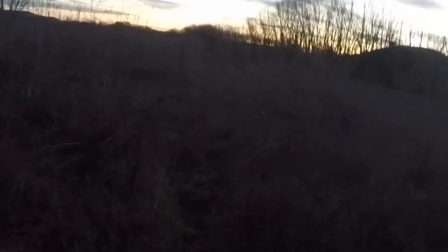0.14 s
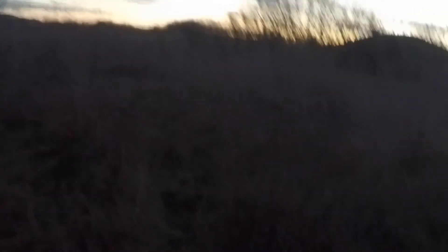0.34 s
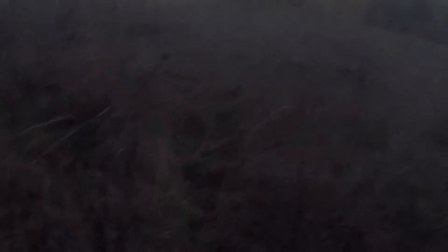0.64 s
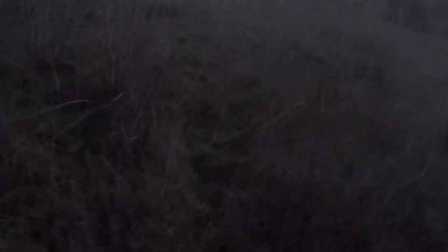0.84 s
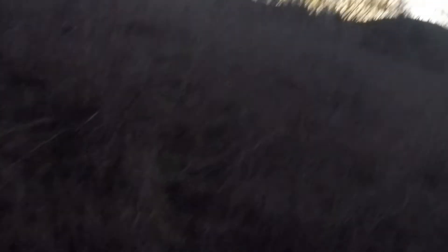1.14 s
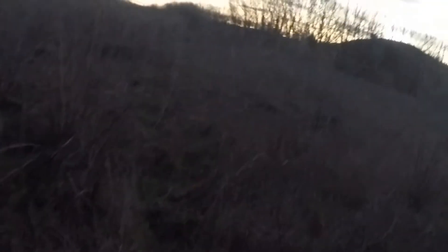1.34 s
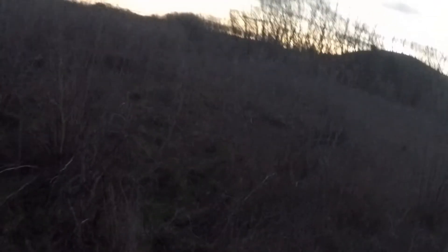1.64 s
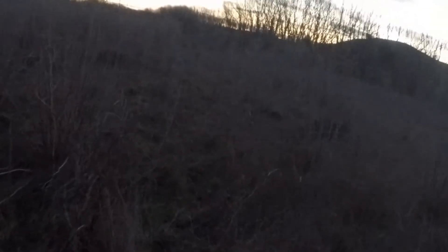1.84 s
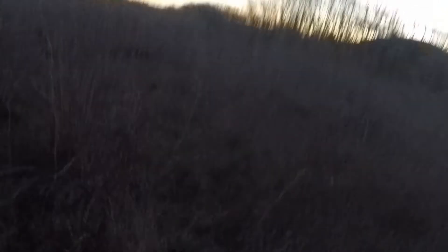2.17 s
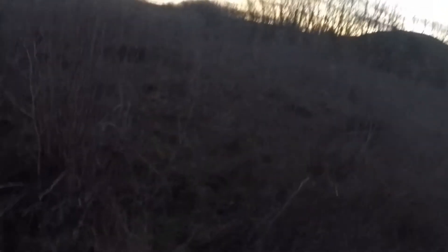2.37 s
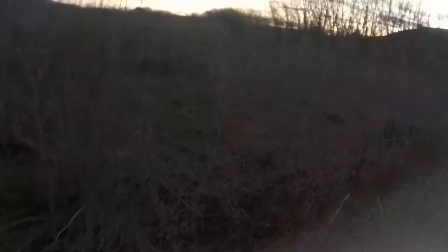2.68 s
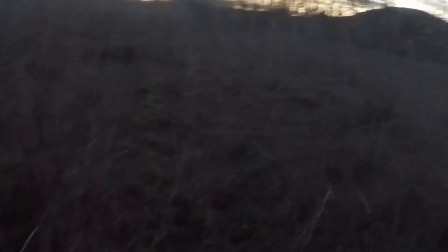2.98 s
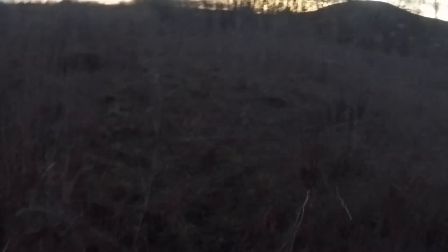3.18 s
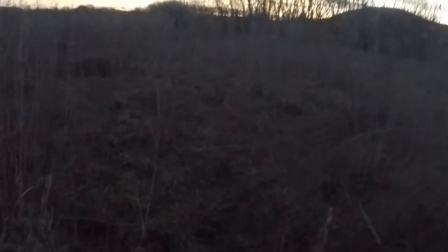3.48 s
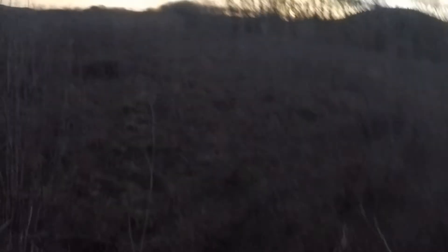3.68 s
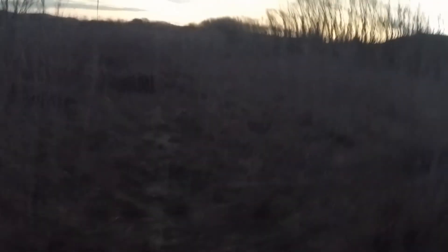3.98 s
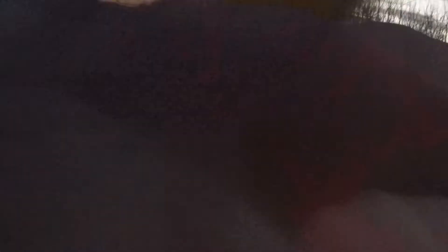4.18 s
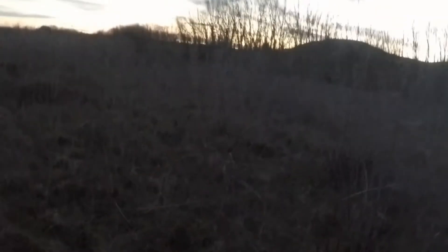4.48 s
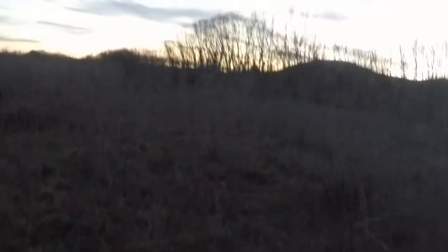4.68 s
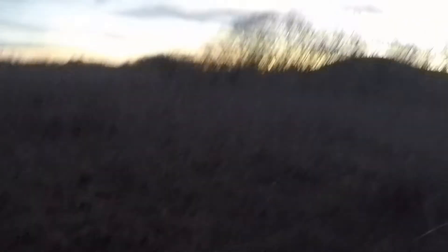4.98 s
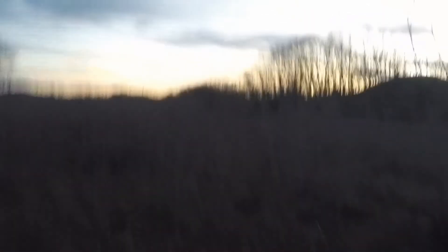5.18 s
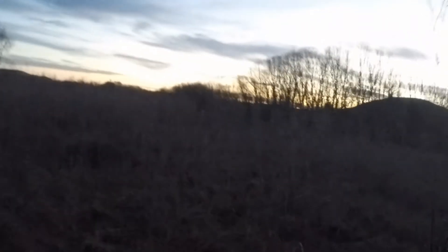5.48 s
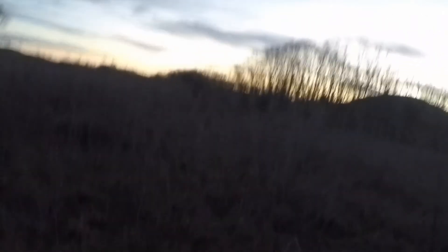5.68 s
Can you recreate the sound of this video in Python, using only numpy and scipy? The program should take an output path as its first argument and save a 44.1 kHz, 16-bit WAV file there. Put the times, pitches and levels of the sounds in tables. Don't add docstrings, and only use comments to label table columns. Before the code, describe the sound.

Dry stalks scrape and tick against a small plastic case while the gripping hand bumps it, building from near quiet to loud cracks and thuds.

```python
import sys
import numpy as np
from scipy import signal
from scipy.fft import next_fast_len
from scipy.io import wavfile

SR = 44100
rng = np.random.default_rng(int(sys.argv[2]) if len(sys.argv) > 2 else 0)


def ratio(d):
    e = np.asarray(d, float) / 20
    return 10 ** e


def wav_out(sig):
    wavfile.write(sys.argv[1], SR, np.round(np.clip(np.atleast_2d(sig).T, -1, 1) * 32767).astype(np.int16))


N = 256794


def drag(grains_per_s=2200, patch_db=2.1, judder_db=1.6):
    # frequency in Hz, level in dB per Hz.
    drag_colour = [(180, -42), (300, -15), (476, -21), (641, -7.5), (835, -13), (968, -1), (1370, -5),
                   (2040, 3), (2790, -4), (4420, -15), (4960, -13), (7500, -19), (8280, -23), (14800, -28),
                   (15500, -27)]
    # start in s, end in s, pitch in Hz, level in dB re the drag.
    singing = [(.245, 0.327, 3560, -8), (.245, 0.325, 7150, 4), (0.735, 0.786, 1330, 8),
               (0.728, 0.778, 2280, 7), (0.89, 1.01, 3510, 1.5), (1.025, 1.135, 905, -2),
               (1.033, 1.13, 2700, -2), (1.15, 1.36, 4400, -11), (1.7, 1.79, 1950, -3),
               (2.767, 2.812, 2130, 3), (2.835, 2.895, 760, -9), (2.982, 3.697, 4390, -17),
               (1.34, 1.46, 2000, -5), (3.485, 3.55, 2250, -3), (4.53, 4.57, 2100, -3),
               (4.6, 4.635, 2300, -3), (4.6, 4.64, 3700, -6), (4.67, 4.695, 2100, -2),
               (4.795, 4.815, 5500, -13), (5.4, 5.62, 2500, -3), (5.72, 5.82, 5450, -8)]
    dull_gain, middle_gain, edge_gain, bright_gain = strokes()

    sizes = ratio(2.5 * np.minimum(rng.exponential(1, (2, N)), 4)) * rng.standard_normal((2, N))
    grains = sizes * (0.6 + 1.5 * (rng.random(N) < grains_per_s / SR))

    edges_hz = np.geomspace(290, 17500, 21)
    hz, colour_db = np.transpose(drag_colour)
    parts = np.zeros((4, N))
    for k, (low, high) in enumerate(zip(edges_hz, edges_hz[1:])):
        centre = np.sqrt(low * high)
        patch = patch_db * (drift(7.9) + 0.87 * drift(30.0))
        gain_db = np.interp(np.log(centre), np.log(hz), colour_db) + patch
        part = np.searchsorted([1000, 2900, 5200], centre)
        parts[part] += ratio(gain_db) * band(grains[k % 2], low, high)
    dull, middle, edge, bright = [rms_one(p) for p in parts]
    rub = dull_gain * dull + middle_gain * middle + edge_gain * edge + bright_gain * bright

    t = np.arange(N) / SR
    for start, end, wall_hz, db in singing:
        stroke = np.clip(np.minimum(t - start, end - t) / 0.01, 0, 1)
        wall = rms_one(ring(grains[0], wall_hz, 40 / wall_hz))
        rub += ratio(db) * middle_gain * stroke * wall

    judder = ratio(judder_db * drift(40.0))
    passband = signal.ellip(10, 0.5, 50, 15300, fs=SR, output="sos")
    return signal.sosfilt(passband, judder * rub)


def strokes():
    # start in s, length in s, level in dB, swell to the end in dB, hardness in dB.
    sweeps = [(0.238, 0.083, -71.5, 0, 25), (0.36, 0.1, -68, -4, 18), (0.723, 0.134, -51.8, -8.0, -21.5),
              (0.901, 0.104, -39, 1.8, 12), (1.148, 0.3, -40.1, 9.4, 2.9), (1.485, 0.1, -39.7, 7.1, 4),
              (1.638, 0.025, -40, 8, 2), (1.663, 0.12, -30.5, -10, 2), (2.403, 0.092, -35.3, 3.3, 4.2),
              (2.501, 0.031, -31, 5, 8), (2.564, 0.012, -25, 9, -1), (2.576, 0.007, -17, -8, -3),
              (2.716, 0.005, -31, -4, 6), (3.247, 0.048, -31.2, -17.1, -3.4),
              (3.338, 0.048, -26.4, -4.6, 4.7), (3.417, 0.03, -30.5, -1.8, 2.8), (3.468, 0.02, -32, 10, 4),
              (3.488, 0.06, -22, -8, 4), (3.565, 0.035, -38.0, 0, -3), (3.602, 0.036, -28.5, -2, 4),
              (3.645, 0.06, -35, 0, -2), (3.892, 0.025, -39, -2, -2), (4.036, 0.036, -33, 6, 4),
              (4.074, 0.064, -55.2, 7.5, -8.4), (4.404, 0.018, -38, -8, 11), (4.532, 0.05, -29, -3, 5),
              (4.598, 0.035, -31, -1, 1), (4.646, 0.048, -40.2, 10, -4), (4.707, 0.136, -42.1, 1.4, -3.2),
              (5.216, 0.09, -48.9, -7.3, 4.9), (5.703, 0.14, -53.2, 1.2, 2.8)]
    rubs = [(0, 0.034, -54.3, -2.9, -23.3), (1.28, 0.183, -38.4, 1.9, -4.5),
            (1.537, 0.042, -50.2, 0.9, 20.8), (1.797, 0.084, -44.7, -4.5, -11.1),
            (1.907, 0.04, -42.9, -4.7, -5.5), (2.062, 0.04, -49, -6, 3), (2.172, 0.222, -39.5, -11, 0),
            (2.737, 0.02, -39, 1, 5), (2.772, 0.14, -25.2, -20.1, 8.5), (2.856, 0.048, -30.9, 5.2, 7.5),
            (2.953, 0.019, -41.1, -13.5, -2.0), (2.976, 0.012, -30, 0, -6), (2.988, 0.137, -27, -13, 4),
            (3.071, 0.045, -47.5, 4.2, 16.7), (3.128, 0.066, -41.7, -3, -0.8), (3.187, 0.036, -37.4, 1, 4),
            (3.724, 0.14, -41.9, -8.6, -1.6), (3.947, 0.068, -56, 6, -14),
            (4.32, 0.071, -58.5, -20.4, -22.2), (4.58, 0.02, -36, 0, 0), (4.775, 0.04, -37, 2, -1),
            (4.849, 0.122, -32.0, -12, -1.7), (4.971, 0.119, -48.5, 11.3, -5.2),
            (5.103, 0.093, -50.2, -5.2, -6.4), (5.331, 0.049, -58.3, 5.9, -9.4), (5.39, 0.13, -60, -6, 3),
            (5.655, 0.025, -60.1, -1.2, -8.3)]
    # dull part in dB, rise in dB per s, fall in dB per s.
    sweep_rule = (-14.9, 3000, 1500)
    rub_rule = (-9, 2000, 1170)
    # time in s, pressure in dB.
    rest = [(0.0, -65.1), (0.4, -58.2), (0.69, -65.4), (0.85, -59.0), (1.08, -57.0), (1.6, -45.3),
            (2.03, -60.8), (2.13, -59.6), (2.6, -56.1), (2.71, -60.7), (3.4, -58.1), (4.0, -59.8),
            (4.29, -71.9), (4.39, -57.9), (4.46, -67.2), (4.52, -60.4), (5.36, -61.3), (5.56, -76)]
    # dull, middle, edge and bright part in dB.
    rest_parts_db = (-7, -0.7, -5, -8)
    t = np.arange(N) / SR
    rest_s, pressure_db = np.transpose(rest)
    power = ratio(np.interp(t, rest_s, pressure_db) + np.array(rest_parts_db)[:, None]) ** 2
    for rows, (dull_db, rise, fall) in ((sweeps, sweep_rule), (rubs, rub_rule)):
        for start, length, db, swell_db, hard_db in rows:
            near = slice(max(int((start - 0.1) * SR), 0), int((start + length + 0.15) * SR))
            age = t[near] - start
            swell = swell_db * np.clip(age / length, 0, 1)
            hard = hard_db + 0.13 * swell
            level = db + swell - rise * np.maximum(-age, 0) - fall * np.maximum(age - length, 0)
            parts = [dull_db - 0.25 * hard, 0 * hard, -7.7 + 0.77 * hard, -15.8 + hard]
            power[:, near] += ratio(level + np.array(parts)) ** 2
    return np.sqrt(power)


def cavity(x, shift):
    # frequency in Hz, width in Hz, gain in dB.
    peaks = [(4400, 450, 3), (4980, 300, -6), (5450, 300, 3), (6200, 400, -3), (7050, 400, 3),
             (7650, 300, 2), (8500, 500, -3), (10500, 1400, 3.5), (11900, 700, -3)]
    for hz, width_hz, db in peaks:
        w, lift = 2 * np.pi * shift * hz / SR, ratio(db / 2)
        spread = np.sin(w) * width_hz / hz / 2
        zeros = [1 + spread * lift, -2 * np.cos(w), 1 - spread * lift]
        poles = [1 + spread / lift, -2 * np.cos(w), 1 - spread / lift]
        x = signal.lfilter(zeros, poles, x)
    return x


def covered_drag():
    rub = drag()
    covered = np.clip(drift(2.5) - 0.3, 0, 1)
    return (1 - covered) * cavity(rub, 1) + covered * cavity(rub, 0.92)


def impacts():
    # time in s, peak in dB, ring in Hz, bright crack in dB relative to the ring,
    # case modes in dB relative to the ring.
    stems = [(0.179, -43, 1730, -19, -21), (0.2465, -48.5, 3570, 12, -10), (0.3009, -40.5, 2570, 6.5, -2),
             (0.386, -37, 1590, -5, -16), (0.4165, -36.5, 1250, -6, -6), (0.8095, -40, 2100, -29, -3),
             (1.1443, -30, 2130, -23, 3), (2.7146, -18, 3600, -1, -4), (2.9749, -14, 1100, -28, -17),
             (3.2352, -20, 2450, -27, -6), (3.6526, -14.5, 710, -30, -7), (3.7494, -18, 2390, -22, -15),
             (4.3988, -16, 1930, -9, -37), (4.4674, -41.5, 2640, 1, -12), (4.5297, -14.5, 1970, -31, -28),
             (5.0234, -6, 4600, 0, -4), (5.1515, -22.5, 2340, -31.5, -9),
             (5.1609, -16.5, 1134, -24.5, -8.5), (5.1756, -27.5, 1700, -32, -13),
             (5.2644, -18, 700, -10, 2), (5.2725, -19.5, 3750, -25, -0.5), (5.3866, -16.5, 2000, -7.5, -12),
             (5.7165, -24.5, 2015, -39, -38)]
    snaps = [(2.7717, -7, 2020, -18, -34), (3.3394, -11, 2130, -15, 0), (3.713, -4.5, 1470, -7, -1.5),
             (3.7563, -16, 2720, -18, -6.5), (3.7824, -10, 1750, -24, -10), (3.7854, 5, 1060, -23, -9),
             (3.7975, -7, 1280, -17, -6), (3.8222, 3, 2250, -16, -7.5), (3.9331, -4.5, 2236, -19.5, -18.5),
             (3.9567, -6.5, 1293, -28.5, 0.5), (3.9652, 3, 2290, -19, -6.5), (3.9752, 0, 1377, -6.5, 11),
             (4.0349, -10, 2310, -27, -18), (4.0772, 10, 2250, -8, -16.5), (4.0914, -7, 1923, -9, -12),
             (4.9868, -4, 2116, -11, -7), (5.0006, -4.5, 4700, 9, -3), (5.0263, -2, 2000, -18, -12),
             (5.0607, -13, 2420, -39, -17), (5.1178, 14.5, 1535, -16.5, -3),
             (5.1397, -11, 1410, -37.5, -19.5), (5.3211, 5, 1500, -22, -12),
             (5.3442, -7.5, 1246, -33, -22.5), (5.3656, -5, 1360, -37, -19)]
    further_ticks = [(0.072, -47, 1500, -20, -10), (0.792, -42, 2200, -25, -8), (0.9046, -27, 3600, -8, -6),
                     (1.4893, -32, 3500, -6, -6), (1.577, -27, 4500, 0, -6), (1.8594, -30, 1010, -14, -3),
                     (2.354, -38, 2200, -4, -6), (2.5165, -14, 2090, -8, -4), (2.5375, -20, 2500, -12, -4),
                     (2.5755, -7, 1900, -20, -3), (2.9489, -29, 2020, -20, -10), (3.188, -25, 900, -25, -8),
                     (3.2035, -25, 2790, -4, -6), (3.637, -20, 1500, -8, -3), (3.679, -24, 2200, 2, -6),
                     (3.811, -26, 2300, -6, -6), (4.0105, -27, 1100, -25, -8), (4.04, -22, 2510, -12, -6),
                     (4.545, -19, 2100, -14, -8), (4.751, -29, 1800, -10, -4), (5.033, -22, 1900, -25, -10),
                     (5.282, -30, 3000, -2, -6), (5.685, -60, 3000, 12, -10)]
    return ticks(stems) + ticks(snaps) + ticks(further_ticks)


def ticks(contacts, cycles=7.2, rattle_db=-12, settle_db=-38):
    # frequency in Hz, level in dB, decay by 60 dB in s.
    case_modes = [(1456, -3.5, 0.0093), (2510, 2.5, 0.0071), (3090, -4, 0.0047), (4200, -9.5, 0.0081),
                  (6200, -24.5, 0.0014), (10300, -22.5, 0.0038)]
    out, t = np.zeros(N + 4096), np.arange(4096) / SR
    rattles = rng.standard_normal((len(contacts), 4096))
    strengths = rng.standard_normal((len(contacts), 8))
    for (s, peak_db, hz, crack_db, case_db), rattle, strength in zip(contacts, rattles, strengths):
        push = ratio(rattle_db) * rattle * np.exp(-t / 0.00115)
        push[0] = -1
        settle = ratio(settle_db) * band(rattle, 700, 4600) * np.exp(-t / 0.0041)
        blow = push + settle

        case = 0
        for (mode_hz, db, t60), d in zip(case_modes, strength):
            case = case + ratio(db + 2 * d) * ring(blow, mode_hz, t60)
        stem = band(ring(blow, hz, cycles / hz), 0.28 * hz, min(5.2 * hz, SR / 2.2))
        body = stem + ratio(case_db) * band(case, 700, 9000, order=1)

        snap = push * np.exp(-t / 0.0012) + 0.5 * rattle * np.exp(-t / 0.0005)
        crack = band(snap, 4500, 10200)
        tick = body / np.abs(body).max() + ratio(crack_db - 2.0) * crack / np.abs(crack).max()
        at = round(s * SR)
        out[at:at + 4096] += ratio(peak_db) * tick
    return out[:N]


def grip():
    # time in s, level in dB, time to lose 12 dB in s.
    sways = [(0, -32.3, 0.195), (0.219, -35.9, 0.174), (0.367, -24.9, 0.139), (0.972, -28.3, 0.121),
             (1.296, -30.5, 0.104), (1.383, -8.0, 0.034), (1.524, -28.5, 0.199), (1.866, -34.4, 0.276),
             (2.083, -32.3, 0.148), (2.185, -19.5, 0.069), (2.381, -22.9, 0.075), (2.483, -17.7, 0.054),
             (2.577, -10.1, 0.044), (2.8, -27.1, 0.07), (2.922, -15.0, 0.167), (3.132, -17.2, 0.172),
             (3.248, -12.7, 0.034), (3.356, -20.9, 0.211), (3.685, -14.4, 0.114), (3.801, -5.2, 0.04),
             (3.929, -10.6, 0.06), (3.991, -10.9, 0.056), (4.086, -18.4, 0.082), (4.369, -17.3, 0.067),
             (4.613, -17.2, 0.11), (4.803, -24.0, 0.244), (5.001, -16.8, 0.149), (5.277, -11.0, 0.052),
             (5.393, -16.3, 0.021), (5.698, -23.4, 0.037)]
    # time in s, level in dB, time to lose 12 dB in s, bump in dB relative to the shake.
    shakes = [(0, -22.2, 0.014, -19.2), (0.925, -38.1, 0.058, -19.3), (1.273, -33.2, 0.216, -34.9),
              (1.384, -33.5, 0.059, -7.3), (1.684, -28.2, 0.147, -17.6), (1.854, -16.1, 0.028, -21.8),
              (2.227, -28.4, 0.078, -17.3), (2.416, -22.3, 0.059, -31.9), (2.577, -9.0, 0.039, -44.0),
              (2.77, -4.2, 0.063, -36.3), (2.848, -15.9, 0.103, -20.9), (3.198, -39.7, 0.063, -0.1),
              (3.326, -13.4, 0.021, -24.8), (3.52, -21.5, 0.2, -15.4), (3.675, -10.7, 0.027, -19.0),
              (3.793, -20.0, 0.022, 9.4), (3.859, -17.0, 0.167, -39.7), (3.97, -10.6, 0.035, -11.6),
              (4.048, -4.6, 0.033, -34.8), (4.096, -14.2, 0.029, -22.0), (4.596, -20.6, 0.025, -22.2),
              (4.869, -31.8, 0.174, -10.9), (5.022, -28.7, 0.053, 4.5), (5.159, -11.8, 0.024, -14.7),
              (5.274, -36.9, 0.058, 7.6), (5.403, -35.5, 0.103, -34.7), (5.649, -46.6, 0.064, -37.5)]
    at, shake_db, length, bump_db = np.transpose(shakes)
    rocking = efforts(*np.transpose(sways)) + ratio(-49)
    shaking = efforts(at, shake_db, length)
    bumping = efforts(at, shake_db + bump_db, length)
    bumping = bumping + ratio(-19) * strokes()[1] + ratio(-69.5)

    white = rng.standard_normal((3, N))
    sway = evened(white[0], 16, 45.3, share=0.17)
    shake = evened(white[1], 42, 95, share=0.26)
    slope = signal.lfilter([1], [1, -0.992], signal.lfilter([1], [1, -0.98], white[2]))
    bump = evened(slope, 90, 560, share=0.1)

    swings, dip = jolts()
    rocked = rocking * (sway + ratio(-45) * shake + ratio(-40) * bump)
    handled = rocked + ratio(-6.5) * shaking * shake + bumping * bump
    return dip * ratio(-2.0) * handled + swings


def jolts():
    # time in s, level in dB, swing in Hz, damping per swing, direction as a signed factor.
    blows = [(1.36, -17, 30, 2.5, -1), (1.381, -13, 26, 1.1, 1), (2.541, -14, 41, 0.1, 1),
             (2.571, -11, 95, 2.2, 1), (2.749, -15, 54, 0.15, 1), (2.887, -14, 45, 1.5, 1),
             (3.659, -11, 22, 1.8, 1), (3.651, -11.5, 38, 1.2, -1), (3.681, -5, 45, 3.1, -0.97),
             (3.7837, -2.5, 69.5, 1.2, -0.88), (4.044, -5.5, 70, 1.6, -0.92),
             (4.077, -3.5, 48.4, 1.6, 0.83), (4.988, -8, 45, 2.8, -1), (4.999, -5, 14, 5, 1),
             (5.025, -3.5, 90, 2.5, 1), (5.031, -5, 33, 2.6, -1), (5.2645, -7, 85, 2.5, -1),
             (5.273, -9, 19, 2, 1)]
    t, out, dip = np.arange(N) / SR, 0, 1
    for s, db, hz, damping, direction in blows:
        turns = np.maximum(t - s, 0) * hz
        onset = 1 - np.exp(-(8 + 20 * damping) * turns)
        decay = np.exp(-damping * turns) / (1 + (turns / 3.1) ** 8)
        out = out + direction * ratio(db + 5.0) * np.sin(2 * np.pi * turns) * decay * onset
        dip_start = np.clip((t - s) / 0.015 + 1, 0, 1)
        release = np.exp(-0.6 * damping * turns - (turns / 3.6) ** 4)
        dip = dip * (1 - 0.85 * dip_start * release)
    return band(out, 9.4, 330, order=1), dip


def efforts(times, levels_db, lengths):
    t, level_db = np.arange(0, N + 40, 40) / SR, -120
    for s, db, length in zip(times, levels_db, lengths):
        away = np.maximum((s - t) / 0.68, t - s)
        level_db = np.maximum(level_db, db - 12 * away / length)
    return ratio(np.interp(np.arange(N) / SR, t, level_db))


def creak():
    # start in s, end in s, slips per s, ring in Hz.
    seam = (1.82, 1.868, 95.5, 954)
    start, end, per_s, hz = seam
    times = np.arange(start, end, 1 / per_s)
    slips, chance = np.zeros(N), rng.standard_normal((16, 2))[:len(times)]
    slips[((times + 0.001 * chance[:, 0]) * SR).astype(int)] = ratio(-27 + 2 * chance[:, 1])
    return band(ring(slips, hz, 0.0085), 390, 2500)


def clasp():
    # time in s, level in dB, decay by 60 dB in s.
    knocks = [
        (2.583, -35.5, 0.17),
        (4.075, -8, 0.078),
    ]
    out = 0
    for s, db, t60 in knocks:
        knock = ratio(db) * (np.arange(N) == round(s * SR))
        out = out + ring(knock, 1860, t60)
    return out


def hiss():
    return ratio(-76.5) * rms_one(band(rng.standard_normal(N), 100, 8000, order=1))


def rms_one(x):
    return x / np.sqrt(np.mean(x ** 2) + 1e-20)


def band(x, low_hz, high_hz, order=2):
    return signal.sosfilt(signal.butter(order, [low_hz, high_hz], "band", fs=SR, output="sos"), x)


def drift(rate):
    r = np.exp(-80 * np.pi * rate / SR)
    slow = signal.lfilter([1], [1, -2 * r, r * r], rng.standard_normal(N // 40 + 2002))[2000:]
    return np.interp(np.arange(N) / 40, np.arange(len(slow)), rms_one(slow))


def ring(clicks, hz, t60):
    r, w = ratio(-60 / (t60 * SR)), 2 * np.pi * hz / SR
    return signal.lfilter([0, np.sin(w)], [1, -2 * r * np.cos(w), r * r], clicks + 1e-18)


def evened(x, low_hz, high_hz, share):
    x = band(x, low_hz, high_hz)
    swell = np.abs(signal.hilbert(x, next_fast_len(N))[:N])
    flattened = x / (swell + 0.13 * np.mean(swell)) ** np.clip(share, 0, 1)
    return rms_one(band(flattened, low_hz, high_hz))


def scene():
    return (covered_drag() + impacts() + grip() + creak() + clasp() + hiss())[None]


def roll_off(x):
    return signal.sosfilt(signal.butter(12, 16550, fs=SR, output="sos"), x)


def record(dry):
    clipped = np.clip(dry, -0.84, 0.84)
    low_pass = signal.cheby2(10, 50, 16600, fs=SR, output="sos")
    return roll_off(signal.sosfilt(low_pass, clipped))


dry = scene()
out = record(dry)
wav_out(out)
```